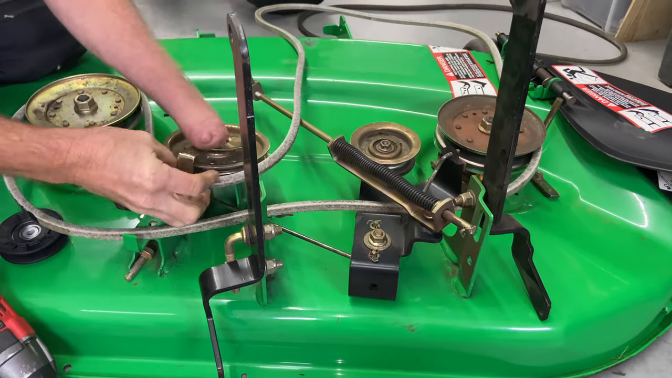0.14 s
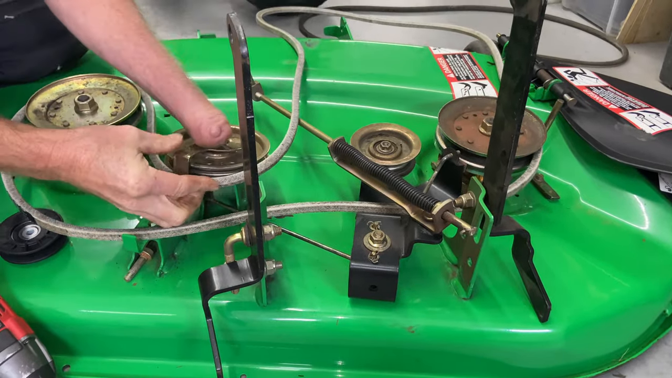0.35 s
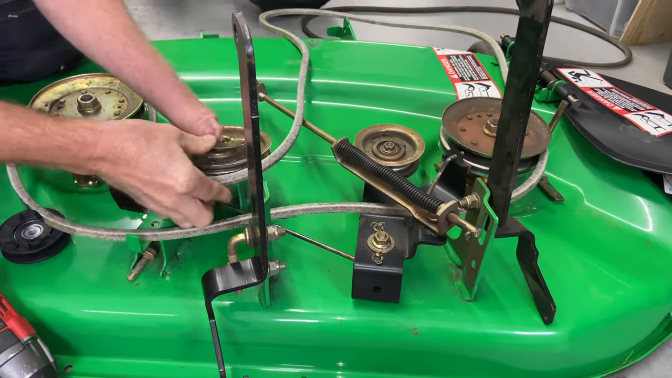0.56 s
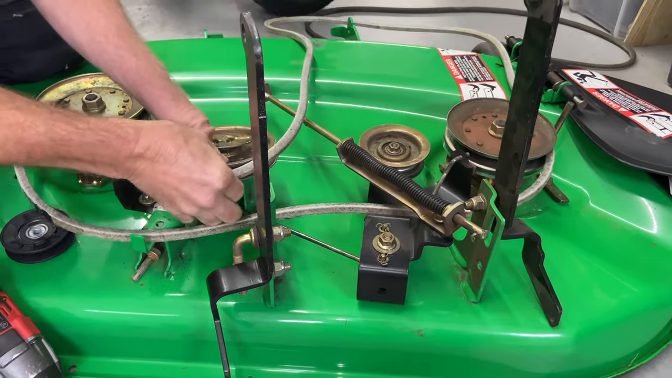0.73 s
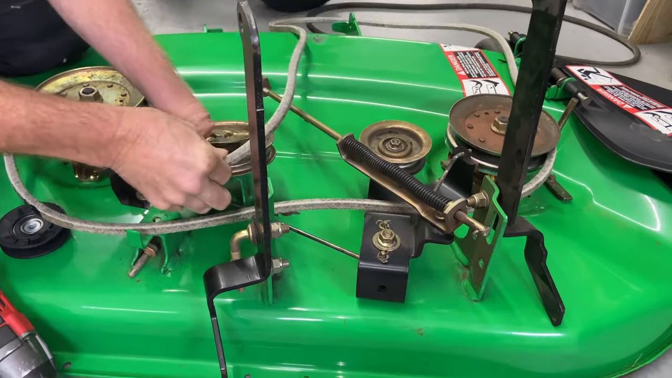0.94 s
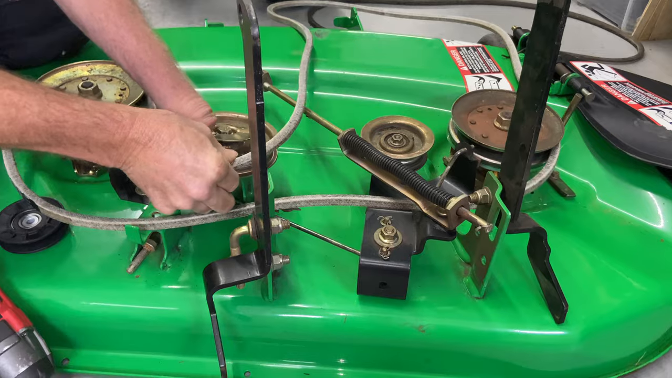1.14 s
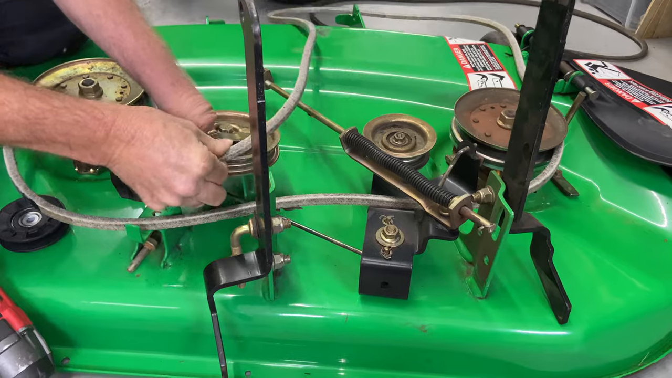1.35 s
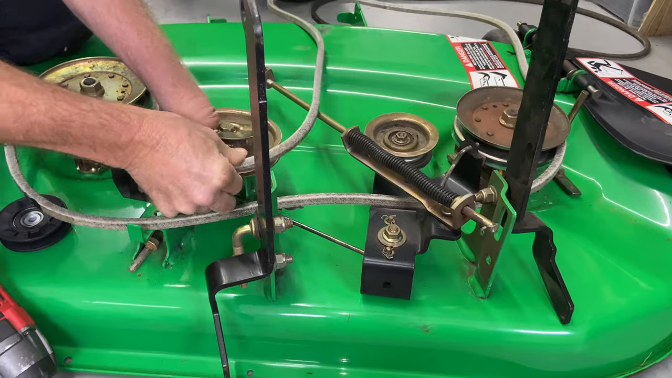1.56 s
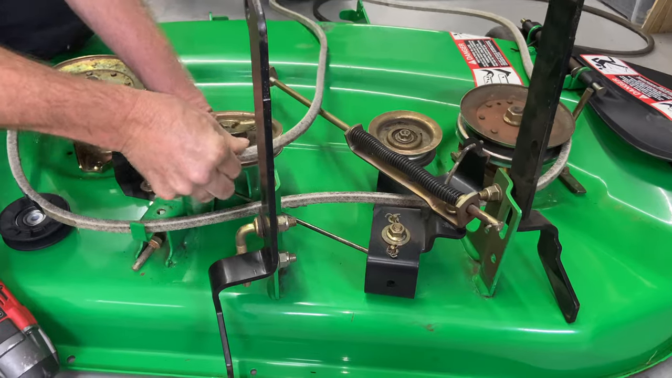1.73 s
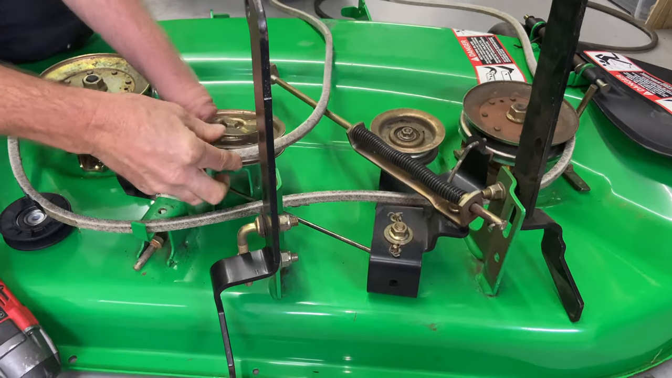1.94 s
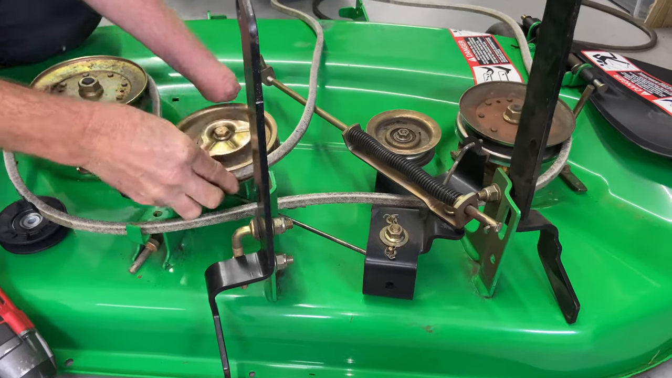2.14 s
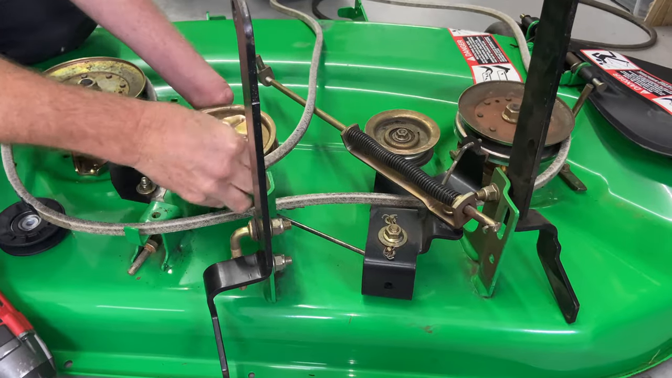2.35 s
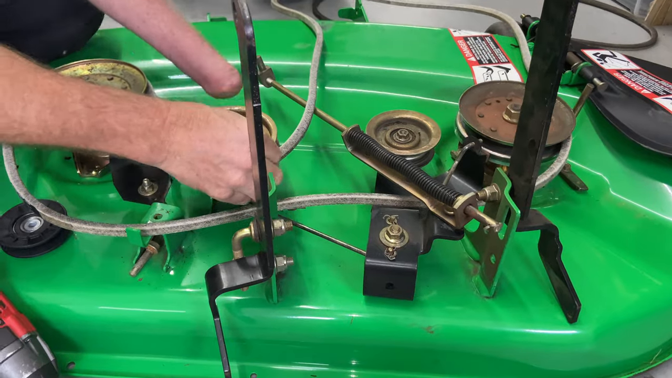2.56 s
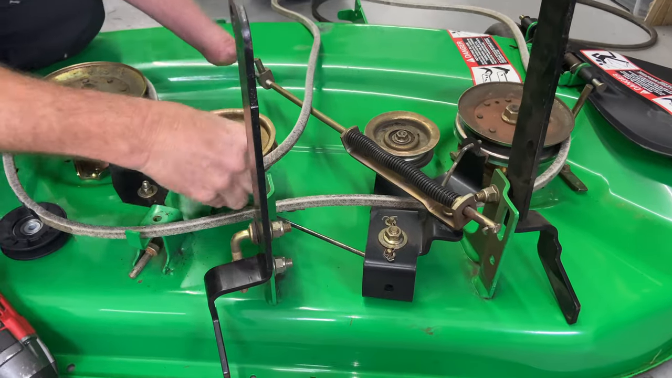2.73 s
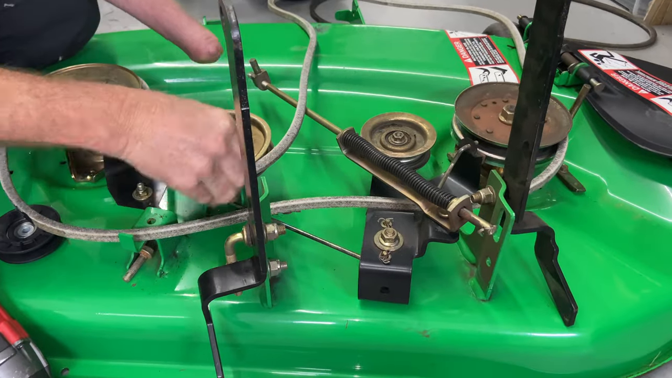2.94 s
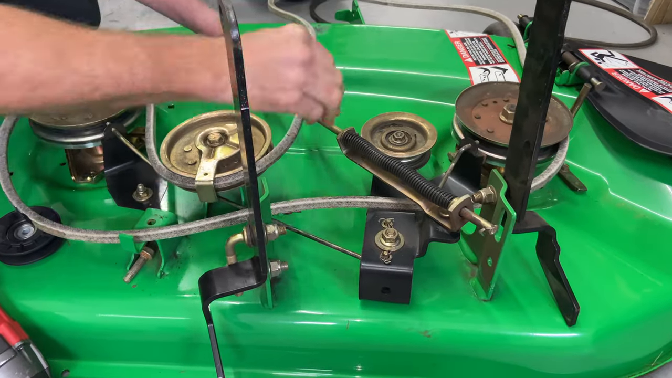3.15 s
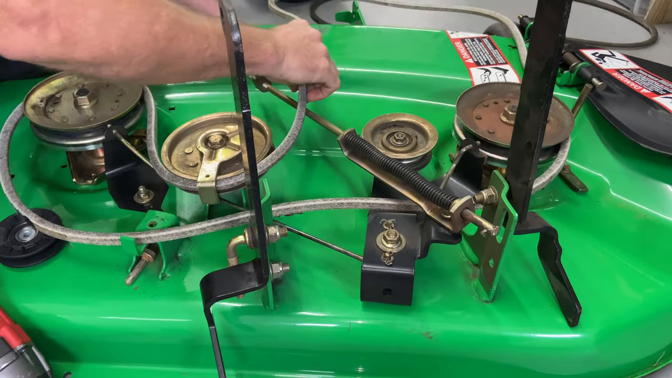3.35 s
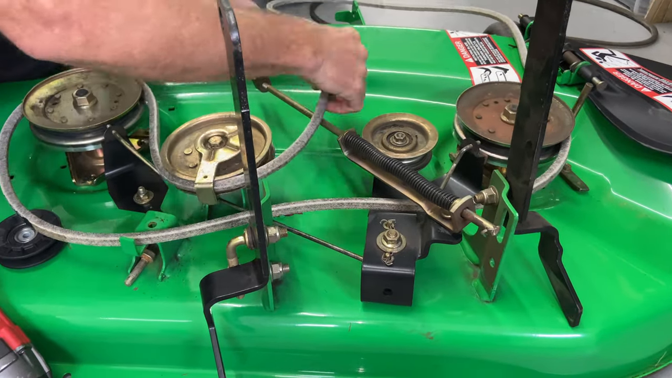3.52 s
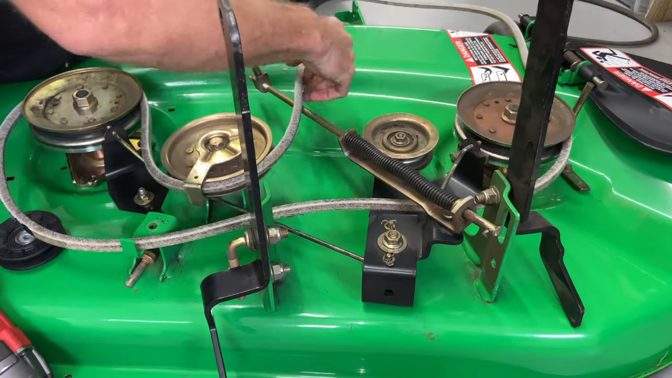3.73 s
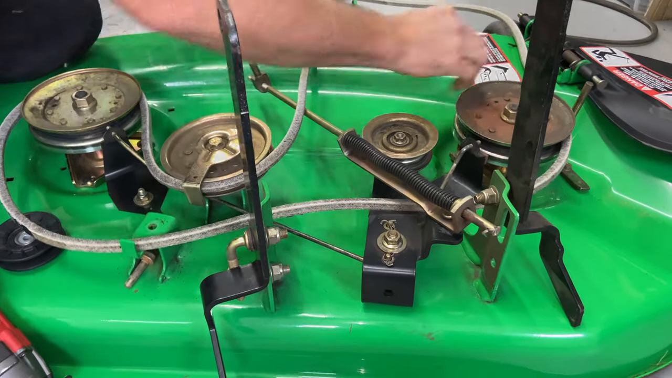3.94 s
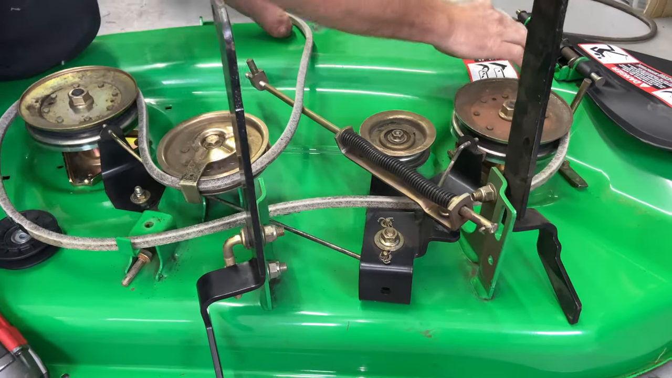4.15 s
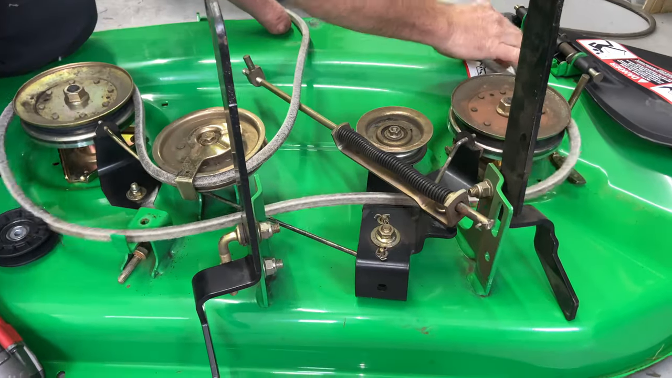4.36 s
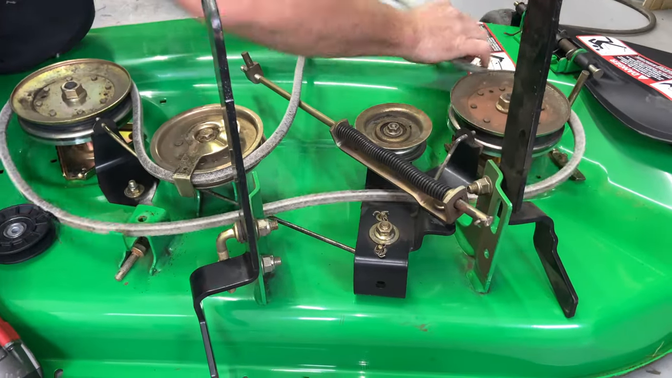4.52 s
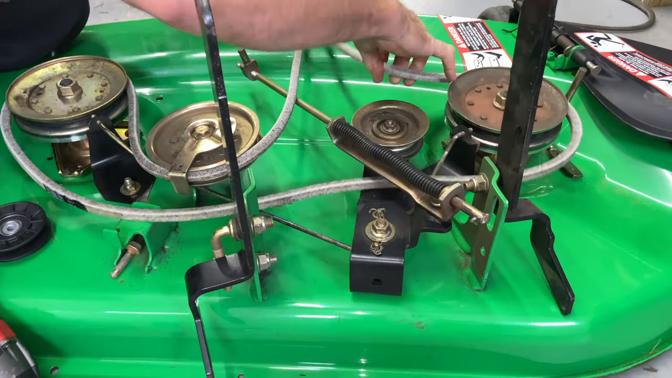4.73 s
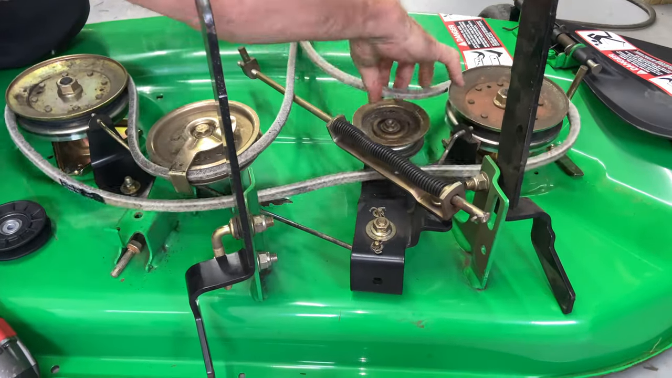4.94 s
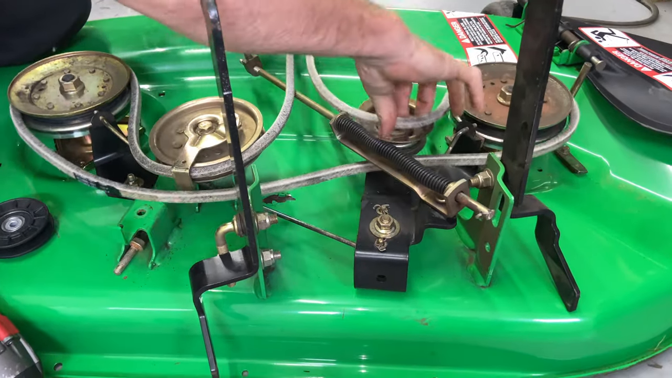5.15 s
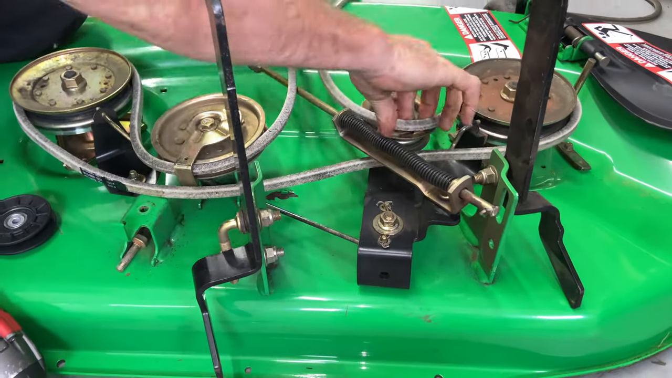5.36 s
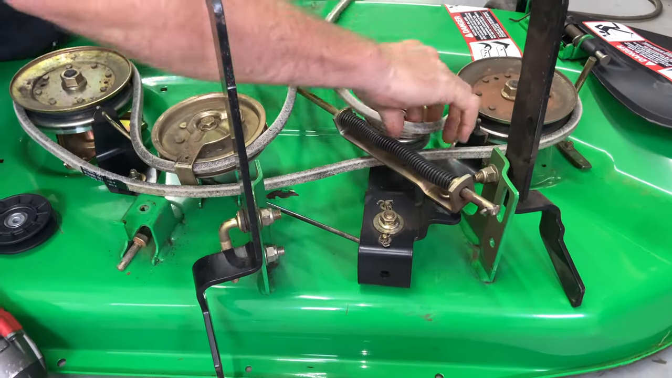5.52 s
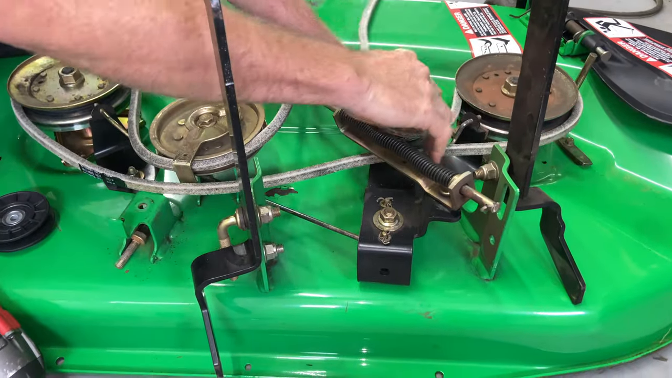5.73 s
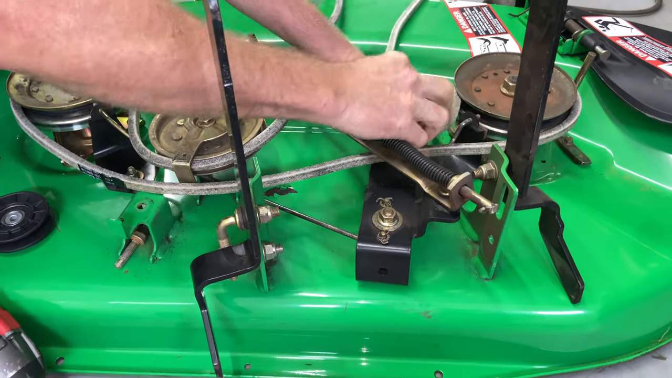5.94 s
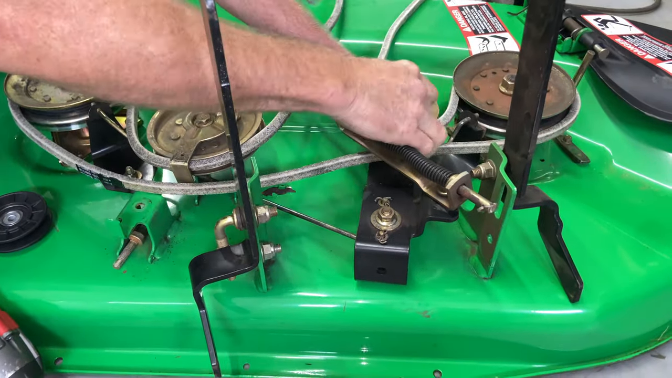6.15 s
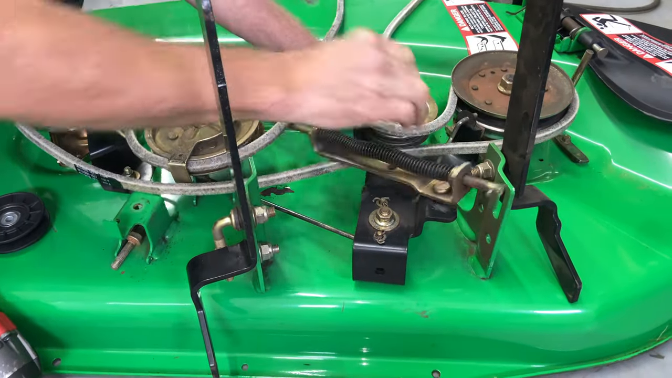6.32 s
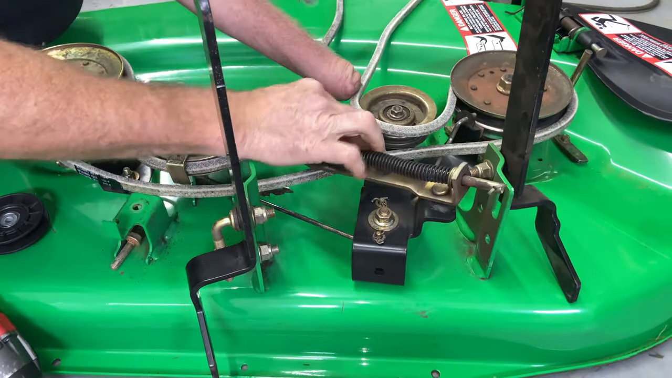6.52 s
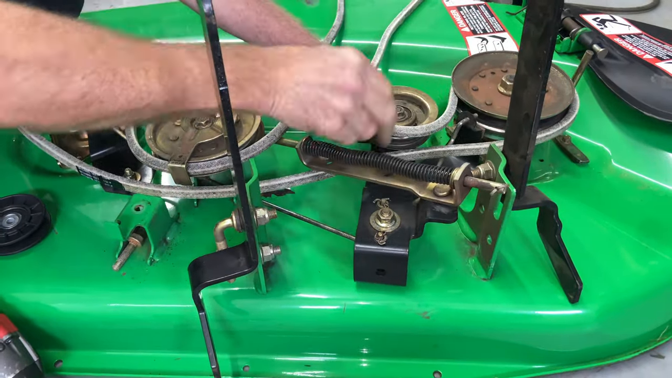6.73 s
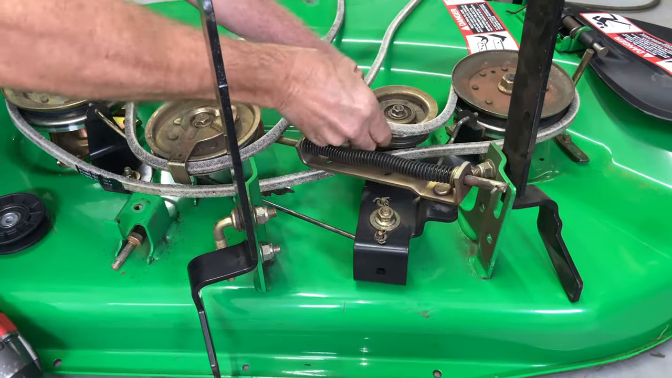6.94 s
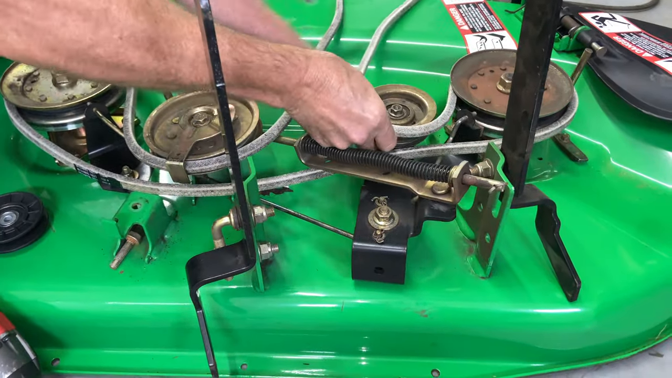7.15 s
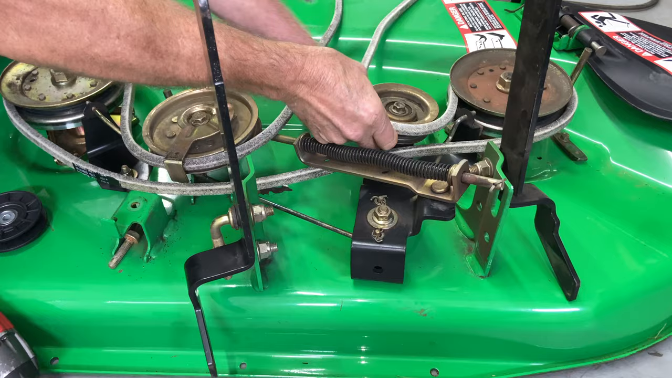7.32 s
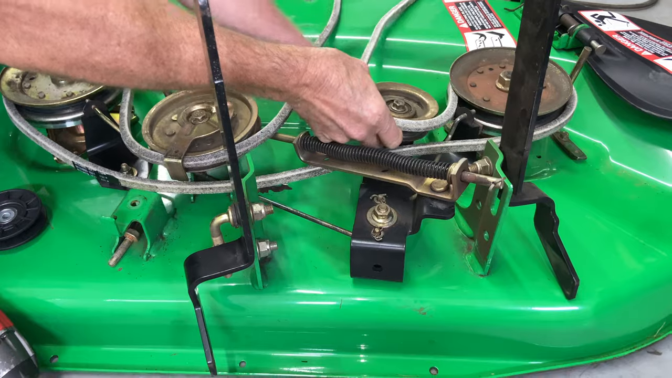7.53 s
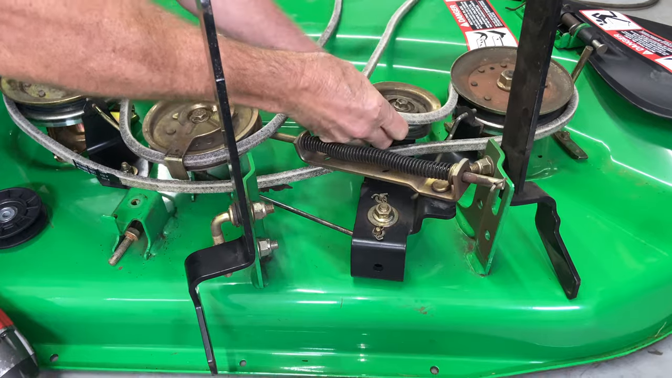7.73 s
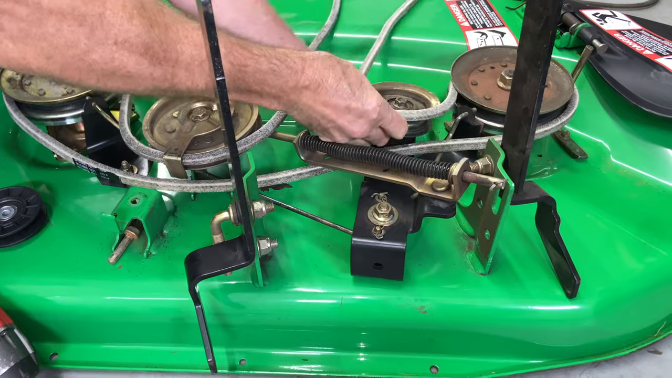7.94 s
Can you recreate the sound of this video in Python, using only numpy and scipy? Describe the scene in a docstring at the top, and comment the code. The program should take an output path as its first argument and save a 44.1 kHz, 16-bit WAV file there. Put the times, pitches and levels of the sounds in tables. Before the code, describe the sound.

A rubber belt is worked around metal pulleys on a hollow steel mower deck, with rubbing, thuds, sharp clinks and one loud clanging snap.

```python
"""In a garage, one close microphone hears a rubber drive belt threaded by hand round a steel mower deck.
From the start the belt rubs and bumps on the hollow deck (noise thuds, booming modes) and the guard clinks
faintly; small parts tick from 1.67 s, and from 2.16 s most clinks are hard. At 4.3 s the belt drops into the
far pulley, at 4.8 s it chirps on a rim, and at 6.35 s the sprung tension arm snaps over and the deck clangs.
Rubbing is filtered random slips, blows are decaying noise and struck modes, with a garage echo and faint air."""
import sys
import numpy as np
from scipy import signal
from scipy.fft import rfft, irfft
from scipy.io import wavfile
from scipy.ndimage import uniform_filter1d

SR = 44100
rng = np.random.default_rng(int(sys.argv[2]) if len(sys.argv) > 2 else 0)


def dump_mix(stems):
    """Bounce the given channels to the path in sys.argv[1] as a 16-bit WAV at rate SR."""
    frames = np.atleast_2d(stems).T  # one column per channel
    limited = np.clip(frames, -1, 1)  # hard clip at full scale
    pcm = np.round(limited * 32767).astype(np.int16)
    wavfile.write(sys.argv[1], SR, pcm)


N = 351910
TIME = np.arange(N) / SR
SHORT, LONG = 8192, 32768  # lengths of a blow and of a long ring, in samples
TOP_HZ = 15900


def undb(db):
    """Decibels to gain."""
    return 10 ** (np.asarray(db) / 20)


def rms(x):
    """Root mean square."""
    return np.sqrt(np.mean(x ** 2))


def unit_peak(x, size=176):
    """Scale a blow so that its loudest few milliseconds have rms 1."""
    return x / np.sqrt(uniform_filter1d(x ** 2, size).max())


def on_log_axis(hz, points):
    """Read (Hz, value) points along a logarithmic frequency axis."""
    at, value = np.transpose(points)
    return np.interp(np.log(hz + 1), np.log(at), value)


def colour(x, points, tilt_db=0, size=2048):
    """Minimum-phase filter through (Hz, gain dB) points, tilted per octave and closed beyond its ends."""
    hz = np.arange(size // 2 + 1) * SR / size + 1
    octaves_below = np.maximum(np.log2(points[0][0] / hz), 0)
    octaves_above = np.maximum(np.log2(hz / points[-1][0]), 0)
    tilt = tilt_db * np.log2(np.maximum(hz, 100) / 1000)
    db = on_log_axis(hz, points) + tilt - 20 * (octaves_below + octaves_above)
    # folding the cepstrum forward makes the filter causal
    cepstrum = irfft(np.log(undb(db)))
    cepstrum[1:size // 2] *= 2
    cepstrum[size // 2 + 1:] = 0
    impulse = irfft(np.exp(rfft(cepstrum)))
    return signal.fftconvolve(x, impulse)[:len(x)]


def resonate(x, hz, q):
    """One resonance with gain 1 at its centre."""
    return signal.lfilter(*signal.iirpeak(hz, q, fs=SR), x)


def fade(t60, size=SHORT):
    """Exponential decay by 60 dB in t60 seconds."""
    return np.exp(-np.log(1000) * TIME[:size] / max(t60, 1e-3))


def tone(hz, t60, size=SHORT):
    """One struck mode: a decaying sine."""
    return np.sin(2 * np.pi * hz * TIME[:size]) * fade(t60, size=size)


def burst(t60, size=SHORT):
    """Decaying noise with an evened spectrum, like countless close modes dying together."""
    # the two decays together give t60
    spectrum = rfft(rng.standard_normal(size) * fade(t60 * 5 / 4, size=size))
    power = np.abs(spectrum) ** 2
    evened = spectrum * np.sqrt(power.mean() / uniform_filter1d(power, size=size // 200))
    return irfft(evened) * fade(t60 * 5, size=size)


# no part is quite symmetric: spread of the distance from a mode to its weaker twin
TWIN_SPLIT_HZ = 12


def ring(modes, damping=1, size=LONG):
    """Struck modes in close pairs that beat, randomly weighted at each call; contact damping shortens them."""
    out = np.zeros(size)
    draws = rng.standard_normal((len(modes), 3))
    for (hz, db, t60), (side, weight, split) in zip(modes, draws):
        main = tone(hz, t60 / damping, size=size)
        twin = undb(-5) * tone(hz + TWIN_SPLIT_HZ * split, t60 / damping, size=size)
        out += np.sign(side) * undb(db + 2 * weight) * (main + twin)
    return out


def add(track, s, x):
    """Mix x into the track at time s."""
    start = max(int(s * SR), 0)
    track[start:start + len(x)] += x[:N - start]


def slips(rate, spread_db):
    """Stick-slip: tiny releases at random moments, rate a second, of unequal size and either sign."""
    moment, size = rng.random((2, N))
    out = np.zeros(N)
    at = np.flatnonzero(moment < rate / SR)
    out[at] = (-1) ** at * undb(spread_db * np.minimum(-np.log(size[at]), 4))
    return out


def wander(size):
    """Random levels, each held for size samples and smoothed into slopes."""
    held = np.repeat(rng.standard_normal(N // size + 1), size)
    return uniform_filter1d(held, size)[:N]


# room air at the microphone: pitch_hz, gain_db
AIR_COLOUR = [(25, -9), (190, -10), (500, -17), (1500, -39.5), (3500, -34), (16000, -53)]
AIR_DB = -69.5


def air():
    """Faint steady room noise, filtered from white noise."""
    x = colour(rng.standard_normal(N), AIR_COLOUR)
    return undb(AIR_DB) * x / rms(x)


# reverberation of the garage: pitch_hz, t60_s
GARAGE_T60 = [(100, 0.17), (1500, 1), (4000, 0.71), (8000, 0.49), (14000, 0.5)]
GARAGE_DB = -10.5


def garage(x, count=9):
    """Diffuse echo of hard walls: bands of noise that each decay in their own time."""
    hz = np.arange(SR // 2 + 1)
    centres = np.geomspace(60, TOP_HZ, count)
    noise = rfft(rng.standard_normal(SR))
    tail = np.zeros(SR)
    for centre, band in zip(centres, np.eye(count)):
        band_noise = irfft(noise * on_log_axis(hz, np.c_[centres, band]), SR)
        tail += band_noise * fade(on_log_axis(centre, GARAGE_T60), size=SR)
    tail = tail * np.clip(TIME[:SR] / 0.0062, 0, 1)  # the echo builds up over 6.2 ms
    return signal.fftconvolve(x, tail / np.sqrt(np.sum(tail ** 2)))[:N]


# the belt drags on the deck, one level curve a pull: time_s, level_db
PULLS = [
    [(0.0, -60.5), (0.45, -80.5), (0.80, -64), (1.01, -72), (1.40, -64.5), (1.95, -60.5), (2.13, -55.5)],
    [(2.88, -64.5), (3.212, -62.5), (3.42, -66.5), (3.626, -56.5), (3.714, -53.5), (3.95, -92),
     (4.14, -71.5)],
    [(4.2, -63.5), (4.31, -52.5), (4.55, -62.5), (5.13, -55.5), (5.42, -69.5), (5.66, -57), (5.8, -61),
     (6.04, -61.5), (6.32, -71.5)],
    [(7.2, -81), (7.398, -62), (7.6, -74), (7.694, -62), (7.83, -90), (7.97, -58.5)],
]
# drag rumble on the deck: pitch_hz, gain_db
DRAG_COLOUR = [(80, -8.5), (130, -8.5), (190, 3), (450, 0), (850, -10), (1300, -23.5), (2400, -30)]
# rustle of the belt: pitch_hz, gain_db
HISS_COLOUR = [(1500, -10.5), (2400, 1.5), (6400, -6), (8500, -13.5), (14500, -21)]
# soft blows and jostles on the deck: pitch_hz, gain_db
BUMP_COLOUR = [(60, -32.5), (115, -15), (185, 4.5), (300, -2), (450, -5), (700, -11.5), (1500, -37),
               (5000, -34)]
# small dry contacts: pitch_hz, gain_db
TICK_COLOUR = [(500, 1), (1500, -11.5), (2600, 5.5), (6500, 0.5), (9000, -9.5), (16000, -18)]
# modes of the bent steel guard, undamped: pitch_hz, level_db, t60_s
GUARD_MODES = [(2643, -1, .07), (3784, 0, .15), (3903, -13, .65), (4140, 4, .06), (5696, 4.5, .11),
               (6185, 2, .07), (6971, -11, .47), (7913, -7, .21), (8414, -6, .2), (8899, -2, .28),
               (9911, -8, .22), (10490, -12, .35)]
# layers of the pull: levels relative to its curve, rates per second
DRAG_DB, RUSTLE_DB = -2, -20.5
JOSTLE_RATE, JOSTLE_DB, JOSTLE_HZ = 6.2, -5, (189, 285, 400)
FINE_TICK_RATE, FINE_TICK_DB = 9, -28


def belt():
    """Rubber slipping over the deck: a soft rumble, jostles, rustle and ticks, all swelling with the pull."""
    grip = undb(7.3 * np.tanh(wander(size=1400)))  # the hand's pressure varies within limits
    drag = colour(slips(rate=900, spread_db=-1.5) * grip, DRAG_COLOUR)
    nudges = colour(slips(rate=JOSTLE_RATE, spread_db=1), BUMP_COLOUR)
    jostle = sum(resonate(nudges, hz, q=25) for hz in JOSTLE_HZ)
    rustle = colour(slips(rate=2300, spread_db=6.5) * undb(3.5 * wander(size=1500)), HISS_COLOUR)
    steel = sum(resonate(rustle, hz, q=24) for hz, db, t60 in GUARD_MODES)
    rustle = rustle + undb(7.5) * steel  # the steel sings along
    tick_train = signal.fftconvolve(slips(rate=FINE_TICK_RATE, spread_db=-4.5), burst(.025))[:N]
    fine_ticks = colour(tick_train, TICK_COLOUR)
    pull = np.zeros(N)
    for curve in PULLS:
        s, db = np.transpose(curve)
        pull += undb(np.interp(TIME, s, db)) * (TIME >= s[0]) * (TIME < s[-1])
    layers = [(drag, DRAG_DB), (jostle, JOSTLE_DB), (rustle, RUSTLE_DB), (fine_ticks, FINE_TICK_DB)]
    return uniform_filter1d(pull, size=1500) * sum(undb(db) * x / rms(x) for x, db in layers)


# resonances of the idler pulley, stirred by rubbing: pitch_hz, gain_db (over the hiss)
IDLER_MODES = [(2180, 2.2), (2390, 5.5), (3413, 7.3), (5276, 5), (5857, 5.8), (7359, 6.1)]
IDLER_Q = 31
RUB_SKIRT_DB = -8.5  # filter gain an octave either side of the centre


def rub(hz, rough_db, count):
    """Dense fine slips of fabric on steel, filtered round hz; the idler pulley sings along."""
    friction = slips(rate=900, spread_db=2.5)[:count] * undb(rough_db * wander(size=200)[:count])
    hiss = colour(friction, [(hz / 2, RUB_SKIRT_DB), (hz, 0), (hz * 2, RUB_SKIRT_DB)])
    hiss = hiss + resonate(hiss, hz, q=5)
    idler = sum(undb(db) * resonate(hiss, mode_hz, q=IDLER_Q) for mode_hz, db in IDLER_MODES)
    return (hiss + idler) / rms(hiss + idler)


# the belt's fabric cover scrapes over steel: start_s, length_s, level_db (before the swell), centre_hz
SCRAPES = [(0.0, 0.095, -72.5, 3680), (0.558, 0.15, -78, 5070), (1.19, 0.16, -78, 5800),
           (4.336, 0.4, -78, 3900), (7.224, 0.2, -69.5, 564), (4.6, 0.85, -76, 6200),
           (4.579, 0.13, -73, 1060), (4.885, 0.6, -74, 2590), (7.847, 0.14, -77.5, 1094)]
SCRAPE_GRIT_DB, SCRAPE_WAVER_DB = 4.5, 6  # fast and slow unevenness


def scrapes():
    """Long strokes of the belt over steel: rubbing that swells and fades unevenly."""
    out = np.zeros(N)
    for s, length, db, hz in SCRAPES:
        count = int(length * SR)
        swell = np.hanning(count) ** (2 / 3) * undb(SCRAPE_WAVER_DB * wander(size=1800)[:count])
        add(out, s, undb(db) * swell * rub(hz, SCRAPE_GRIT_DB, count=count))
    return out


# the belt catches briefly on a rim: start_s, level_db, centre_hz, t60_s
SCUFFS = [(0.082, -69, 2400, .08), (0.615, -66, 2900, .05), (1.066, -65, 3800, 0.099),
          (1.218, -73, 6500, .13), (1.445, -54, 3300, 0.11), (3.578, -50, 1700, .16),
          (4.310, -44.5, 3940, 0.12), (4.995, -60, 2450, 0.29), (5.275, -54.5, 645, .2),
          (5.67, -51, 700, .25), (5.106, -52, 2520, 0.11), (5.224, -59, 2280, 0.29),
          (5.382, -54.5, 3600, 0.13), (5.666, -59.5, 2187, 0.15), (5.867, -62.5, 2300, 0.18),
          (5.942, -61.5, 1900, 0.11), (7.272, -64.5, 3600, 0.094), (7.361, -65.5, 3300, 0.12),
          (7.47, -62, 480, 0.19), (7.472, -69, 2700, .08), (7.838, -53.5, 1130, 0.14)]
SCUFF_RISE_S, SCUFF_GRIT_DB = 0.035, 5.5


def scuffs():
    """The belt catches and lets go: a short decaying rub with a rounded start."""
    out = np.zeros(N)
    for s, db, hz, t60 in SCUFFS:
        envelope = (1 - fade(SCUFF_RISE_S)) * fade(t60)
        add(out, s, undb(db) * unit_peak(envelope * rub(hz, SCUFF_GRIT_DB, count=SHORT)))
    return out


SQUEAK_S, SQUEAK_LENGTH_S, SQUEAK_DB = 4.845, .07, -65
SQUEAK_START_HZ, SQUEAK_END_HZ = 6920, 5740


def squeak():
    """Rubber sticks and slips fast on a pulley rim: a short, rough, falling chirp."""
    n = int(SQUEAK_LENGTH_S * SR)
    glide = np.linspace(SQUEAK_START_HZ, SQUEAK_END_HZ, n)
    hz = glide * (1 + .04 * wander(size=40)[:n])
    chirp = np.hanning(n) * np.sin(2 * np.pi * np.cumsum(hz) / SR)
    out = np.zeros(N)
    add(out, SQUEAK_S, undb(SQUEAK_DB) * chirp)
    return out


# dry contacts of belt, nails and spring: start_s, level_db (before an 8.5 dB cut; the rattle has none),
# tilt_db_per_octave, t60_s, part_resonance_hz
TICKS = [(1.670, -38.5, -0.5, 0.081, 7400), (1.675, -33, -9.5, 0.022, 2380), (1.681, -34, 2.5, 0.059, 3420),
         (1.958, -32.5, -5, 0.017, 3120), (2.724, -38, -8, 0.013, 2980), (2.838, -47, 0, .03, 7600),
         (4.156, -47, 1.5, .087, 3040), (4.3127, -32.5, -6, 0.055, 3660), (4.3213, -38, -4, .061, 2980),
         (4.8991, -42.5, 0, 0.094, 6360), (5.057, -47, -2, .033, 6900), (5.110, -44, -4, 0.1, 2500),
         (5.225, -46, 3, 0.12, 3300), (5.511, -54, -1, 0.044, 2300), (5.824, -40, -2.5, 0.015, 5220),
         (5.871, -52, 2, .02, 5270), (6.135, -54, 3, 0.017, 5080), (6.4157, -34, 3.5, .023, 7800),
         (7.6747, -50, -5, 0.054, 3420)]
# modes of the deck shell, undamped: pitch_hz, level_db, t60_s
DECK_MODES = [(266, 1.5, 0.25), (382, -5, 0.45), (512, 0, 0.7), (577, -4, 0.65), (642, -5, 0.7),
              (778, 3, 0.6), (859, 0, 0.7), (935, -3, .7), (2223, -13, .55), (2527, -4, 0.5),
              (2785, -7, .5), (2987, -5, 0.55), (3306, -2, 0.7), (3351, -3, 0.7), (3525, -2, .7),
              (3840, -9, .7), (4652, -8, 0.7), (4892, -8, 0.65), (5155, -9, .65)]
SHEET_ABOVE_HZ = 2000  # deck modes above this belong to the sheet
# a tick leaves the sheet steel rattling: level under a tick of this t60; better damped ticks leave less
TICK_RING_DB, TICK_RING_AT_S = -30, 0.07


def ticks():
    """Light contacts damped by rubber and fingers: noise coloured by a small part, then the sheet rattles."""
    out = np.zeros(N)
    high_modes = unit_peak(ring([mode for mode in DECK_MODES if mode[0] > SHEET_ABOVE_HZ]))
    for s, db, tilt_db, t60, hz in TICKS:
        snap = burst(.005)
        tap = colour(burst(t60) + undb(4.5) * snap, TICK_COLOUR, tilt_db)
        part = resonate(tap, hz, q=8.6)
        add(out, s, undb(db - 8.5) * unit_peak(tap + undb(4.5) * part))
        rattle = unit_peak(colour(burst(0.83, size=LONG), TICK_COLOUR))
        rattle_gain = undb(db + TICK_RING_DB) * t60 / TICK_RING_AT_S
        add(out, s, rattle_gain * (rattle + .5 * high_modes))
    return out


# modes of the near pulley: pitch_hz, level_db, t60_s
PULLEY_MODES = [(2934, 1, .42), (3770, 4, .04), (5399, -3, .33), (5720, 11, .045), (5890, 7, .05)]
# modes of the far pulley: pitch_hz, level_db, t60_s
FAR_PULLEY_MODES = [(2790, 1, 0.4), (4040, 7, 0.21), (6422, -9, 0.33), (11400, 1, 0.14)]
PING_S, PING_DB = 3.682, -49.5
FAR_PULLEY_S, FAR_PULLEY_DB = 4.311, -53.5


def pulleys():
    """Struck modes: the near pulley pings on its rim; the belt drops into the far one, which rings briefly."""
    out = np.zeros(N)
    add(out, PING_S, undb(PING_DB) * unit_peak(ring(PULLEY_MODES)))
    add(out, FAR_PULLEY_S, undb(FAR_PULLEY_DB) * unit_peak(ring(FAR_PULLEY_MODES)))
    return out


# the belt guard strikes its pulley: start_s, level_db, shimmer_db and free_ring_db (relative to level_db)
CLINKS = [(0.169, -60.5, -23, -32), (1.074, -60.5, -28, -25), (1.448, -68.5, -24, -18),
          (1.487, -64.5, -21, -21), (1.548, -60.5, -23.5, -12.5), (2.158, -27, -22.5, -3),
          (2.169, -32, -15.5, -15), (2.197, -38.5, -26, -18), (2.417, -56, -24.5, -19.5),
          (2.810, -24.5, -31.5, -36), (3.575, -38.5, -32.5, -25)]
# crack of the guard: pitch_hz, gain_db
CLINK_COLOUR = [(600, -26), (1900, -13.5), (3100, 3), (4000, 6.5), (4800, -11), (6100, 3.5), (6700, -6.5),
                (7400, -19.5), (8900, -14), (11000, -30), (16000, -28)]
# shimmer of the guard: pitch_hz, gain_db
RING_COLOUR = [(1200, -4), (2300, -15), (2900, -16), (3600, -9), (4150, 3), (4900, -12), (5800, 8.5),
               (6600, -15.5), (7600, -26), (8800, -8), (10000, -26), (16000, -42)]
# a harder clink is brighter: untilted at this level, then dB per octave for each dB above it
CLINK_FLAT_DB, CLINK_TILT_PER_DB = -38, 0.77
# fingers that mute the shimmer also shorten the attack: its free t60, the free shimmer, the muting that halves it
CLINK_T60_S, FREE_SHIMMER_DB, HALVING_DB = 0.069, -26, 7.5
# muting also dulls the clink: dB per octave lost for each dB of muting
MUTE_TILT_PER_DB = 0.9
# the pulley sings (relative to the guard's free ring) and the bracket hums (relative to the clink)
PULLEY_RING_DB, BRACKET_DB, BRACKET_HZ, BRACKET_T60_S = -11, -20.5, 175, 1


def guard():
    """Steel on steel: a hard clink, then the guard shimmers, its bracket hums and the pulley sings on."""
    out = np.zeros(N)
    shimmer = unit_peak(colour(burst(0.89, size=LONG), RING_COLOUR))
    free_ring = unit_peak(ring(GUARD_MODES)) + undb(PULLEY_RING_DB) * unit_peak(ring(PULLEY_MODES))
    bracket = tone(BRACKET_HZ, BRACKET_T60_S, size=LONG) * (1 - fade(0.054, size=LONG))
    for s, db, shimmer_db, ring_db in CLINKS:
        muting_db = max(FREE_SHIMMER_DB - shimmer_db, 0)
        mute_tilt_db = MUTE_TILT_PER_DB * muting_db
        tilt_db = CLINK_TILT_PER_DB * (db - CLINK_FLAT_DB) - mute_tilt_db
        t60 = CLINK_T60_S * 2 ** (-muting_db / HALVING_DB)
        crack = unit_peak(colour(burst(t60) + undb(-0.5) * burst(0.005), CLINK_COLOUR, tilt_db))
        muted_modes = [(hz, mode_db - mute_tilt_db * np.log2(hz), decay)
                       for hz, mode_db, decay in GUARD_MODES]
        clink = unit_peak(ring(muted_modes, damping=0.16 / t60, size=SHORT))
        add(out, s, undb(db) * (undb(-2.5) * crack + undb(-1.0) * clink))
        after_ring = undb(shimmer_db) * shimmer + undb(ring_db) * free_ring + undb(BRACKET_DB) * bracket
        add(out, s, undb(db) * after_ring)
    return out


# hard contact on the deck: pitch_hz, gain_db
KNOCK_COLOUR = [(450, -8.5), (720, -2.5), (1100, -3), (1600, -13), (2600, -20.5)]
BUMP_T60_S, KNOCK_T60_S = 0.22, 0.16
# a boom dies by 60 dB within this many of its own cycles, so high booms are short
BOOM_CYCLES = 38


def deck_blow(db, hz, knock_db, shudder_db):
    """One soft blow: the hollow deck thuds and booms, a hard contact knocks, the whole shell shudders."""
    push = 1 - fade(0.007)  # rubber needs a moment to press home
    thud = unit_peak(colour(push * burst(BUMP_T60_S), BUMP_COLOUR))
    boom = unit_peak(push * tone(hz, BOOM_CYCLES / hz))
    low_modes = [mode for mode in DECK_MODES if mode[0] < SHEET_ABOVE_HZ]
    shell = unit_peak(ring(low_modes, damping=14.0, size=SHORT))  # the belt lying on it mutes the ring
    knock = unit_peak(colour(push * (burst(KNOCK_T60_S) + undb(-12.0) * shell), KNOCK_COLOUR))
    shudder = unit_peak(tone(60, 0.21) + tone(98, 0.35))
    blow = unit_peak(thud + undb(1.0) * boom) + undb(knock_db + 0.5) * knock
    return undb(db - 9.0) * blow + undb(shudder_db) * shudder


# belt and hand bump the deck: start_s, level_db (before a 9 dB cut), boom_hz,
# knock_db (relative to the blow, before a 0.5 dB lift)
BUMPS = [(0.04, -46, 295, -17), (0.205, -48, 249, -22), (0.595, -47.5, 286, -21), (0.927, -46.5, 325, -22),
         (1.069, -34, 311, -42), (1.222, -43.5, 330, -19), (1.315, -37.5, 310, -18),
         (1.449, -35.5, 304, -8.5), (1.477, -40.5, 178, -29), (1.661, -28.5, 498, -11),
         (1.671, -27.5, 318, -3.5), (1.958, -35, 434, -4.5), (2.162, -28, 474, -7),
         (2.203, -21.5, 268.5, -14.5), (2.683, -39, 522, -14.5), (2.725, -34.5, 479, -9.5),
         (2.811, -28.5, 290, -9), (2.827, -24.5, 260.4, -23), (2.832, -28, 175, -32),
         (2.967, -31.5, 177, -34), (3.113, -50, 273, -1.5), (3.573, -27.5, 488, -15),
         (3.685, -38.5, 446, -12), (4.322, -27, 499, -17.5), (4.574, -42, 990, -12),
         (4.754, -47.5, 580, -12), (4.9, -33.5, 382, -19), (4.949, -42, 119.5, -7), (5.034, -38, 379, -26),
         (5.113, -43, 229, -30), (5.226, -34.5, 649, -12.5), (5.235, -35, 179.4, -10),
         (5.51, -36, 195, -11.5), (5.545, -45.5, 482, -11), (5.608, -39, 371, -8), (5.664, -33, 288, -18),
         (6.343, -25, 311, -18), (6.641, -27, 365, -11), (7.211, -52.5, 210, -17),
         (7.366, -37.5, 342, -31.5), (7.728, -50.5, 289, -24), (7.838, -35, 258, -13.5)]
# the shell rocks under every bump: level under a bump of SHUDDER_AT_DB, and dB gained per dB of blow
SHUDDER_DB, SHUDDER_AT_DB, SHUDDER_PER_DB = -74.5, -38, 1
# one heavy, soft shove rocks the deck on the floor; level and knock adjusted as in the table
SHOVE_S, SHOVE_DB, SHOVE_HZ, SHOVE_KNOCK_DB, SHOVE_SHUDDER_DB = 4.155, -31, 492, -22.5, -48.5


def bumps():
    """Soft blows on the deck; the harder the bump, the more it shudders. One shove rocks it bodily."""
    out = np.zeros(N)
    for s, db, hz, knock_db in BUMPS:
        shudder_db = SHUDDER_DB + SHUDDER_PER_DB * (db - SHUDDER_AT_DB)
        add(out, s, deck_blow(db, hz, knock_db, shudder_db))
    add(out, SHOVE_S, deck_blow(SHOVE_DB, SHOVE_HZ, SHOVE_KNOCK_DB, SHOVE_SHUDDER_DB))
    return out


# the tension arm snaps over and rebounds: start_s, level_db (of the crash), boom_hz
SLAMS = [(6.353, -16.5, 267.2), (6.359, -20, 505), (6.404, -25.5, 290), (6.432, -20, 245.6),
         (6.440, -27, 185)]
# crash of the arm: pitch_hz, gain_db
SLAM_COLOUR = [(30, -30.5), (110, -12.5), (250, 0), (520, 2.5), (850, 3.5), (1300, -6.5), (1900, -9),
               (2600, 1), (5300, -2), (7500, -11), (11000, -18), (16000, -35.5)]
# wash of the clanging deck: pitch_hz, gain_db
WASH_COLOUR = [(200, -11.5), (520, -1.5), (950, -2.5), (1400, -7.5), (2800, -8), (5000, -4), (9000, -27)]
# the first blow booms most and is brightest; each rebound loses a step of both (dB, dB per octave)
SLAM_T60_S, SLAM_BOOM_DB, BOOM_LOSS_DB, SLAM_TILT_DB, TILT_LOSS_DB = .09, -2, 3, -0.2, 0.43
# the arm's weight thuds into the deck with the first blow; level and knock adjusted as in the bumps
ARM_THUD_DB, ARM_THUD_HZ, ARM_KNOCK_DB, ARM_SHUDDER_DB = -19.5, 258, -6, -62.5
# the deck keeps clanging: a dense wash and its strongest modes
WASH_DB, CLANG_DB = -39, -28


def tension_arm():
    """The spring throws the arm against its stop; each rebound booms less, and the deck shell clangs on."""
    out = np.zeros(N)
    for rebound, (s, db, boom_hz) in enumerate(SLAMS):
        tilt_db = SLAM_TILT_DB - TILT_LOSS_DB * rebound
        crash = unit_peak(colour(burst(SLAM_T60_S), SLAM_COLOUR, tilt_db))
        boom_gain = undb(SLAM_BOOM_DB - BOOM_LOSS_DB * rebound)
        boom = boom_gain * tone(boom_hz, 0.22) * (1 - fade(0.018))
        clang = unit_peak(ring(DECK_MODES, damping=4.9, size=SHORT))
        add(out, s, undb(db) * (crash + boom + undb(-10.0) * clang))
    first_s = SLAMS[0][0]
    add(out, first_s, deck_blow(ARM_THUD_DB, ARM_THUD_HZ, ARM_KNOCK_DB, ARM_SHUDDER_DB))
    wash = unit_peak(colour(burst(1.0, size=LONG), WASH_COLOUR))
    add(out, first_s, undb(WASH_DB) * wash + undb(CLANG_DB) * unit_peak(ring(DECK_MODES)))
    return out


def scene():
    """Everything on the deck, with its echo; the small steel parts are close and sound drier."""
    shell = belt() + bumps() + tension_arm()
    parts = scrapes() + scuffs() + squeak() + ticks() + pulleys() + guard()
    echo = garage(shell + undb(-5.0) * parts)
    return (shell + parts + undb(GARAGE_DB) * echo + air())[None]


def record(dry):
    """The recorder cuts the top: a steep low-pass at TOP_HZ."""
    low_pass = signal.ellip(8, .2, 70, TOP_HZ, fs=SR, output="sos")
    return signal.sosfilt(low_pass, dry)


dry = scene()
out = record(dry)
dump_mix(out)
```